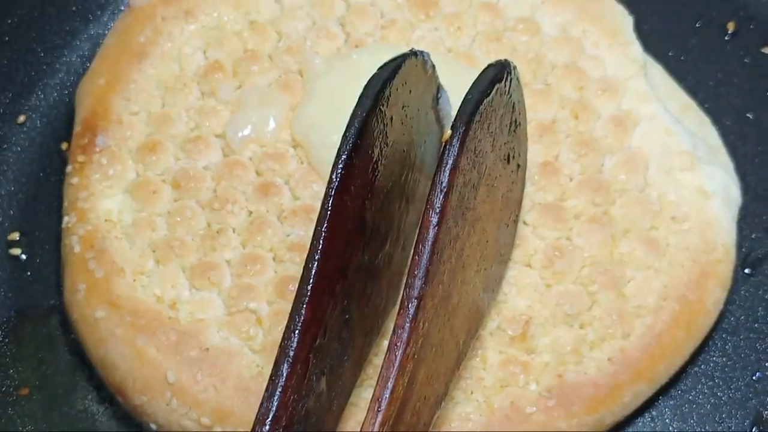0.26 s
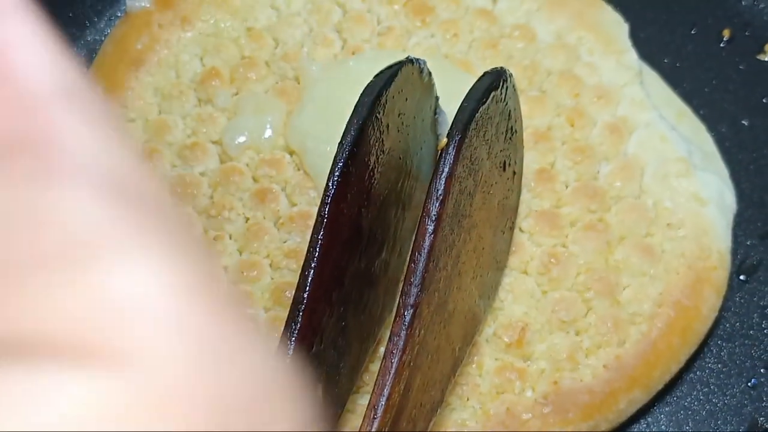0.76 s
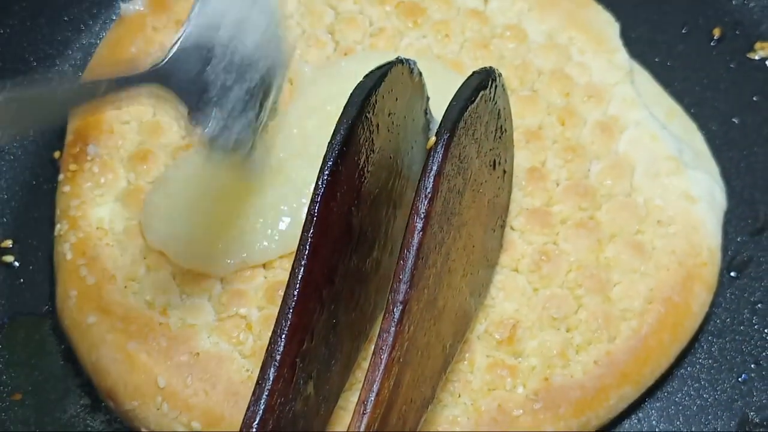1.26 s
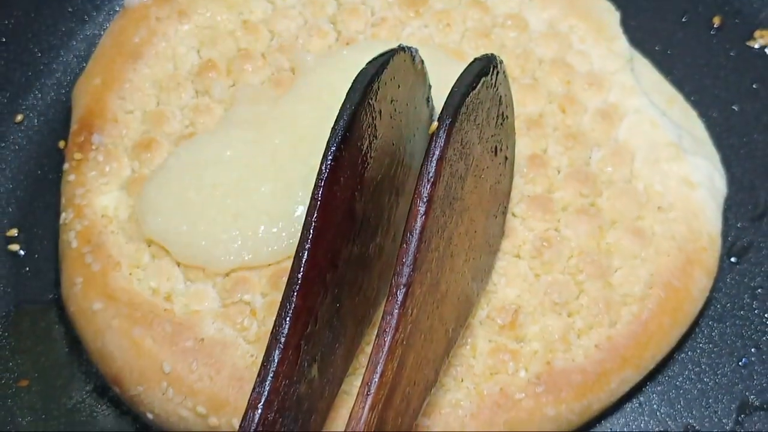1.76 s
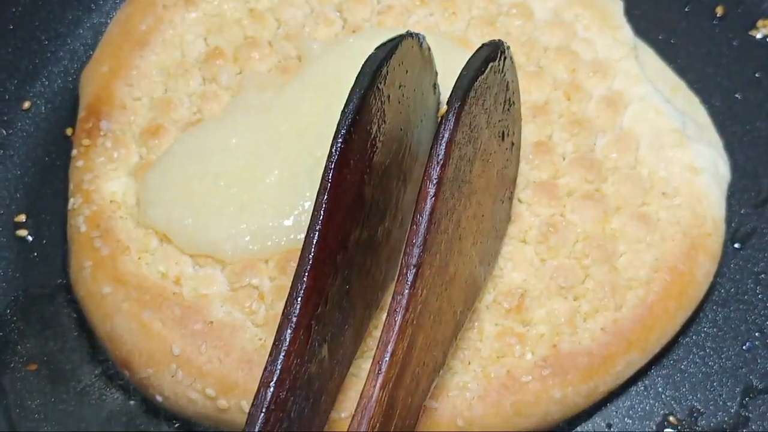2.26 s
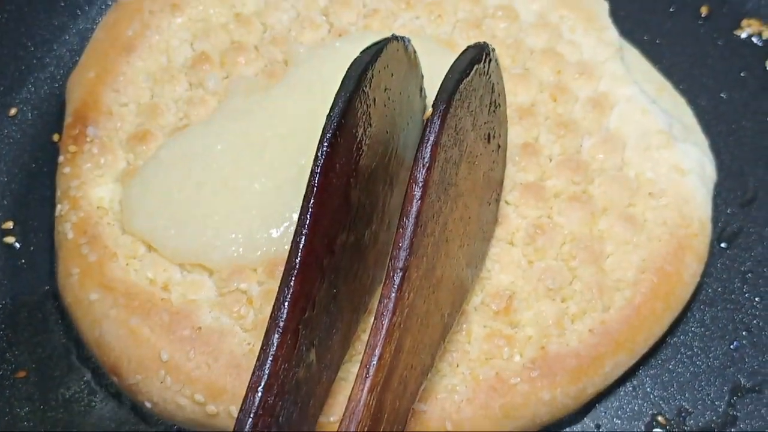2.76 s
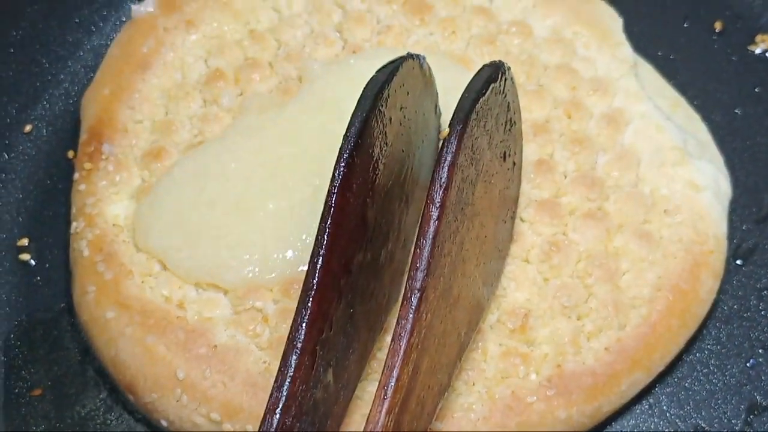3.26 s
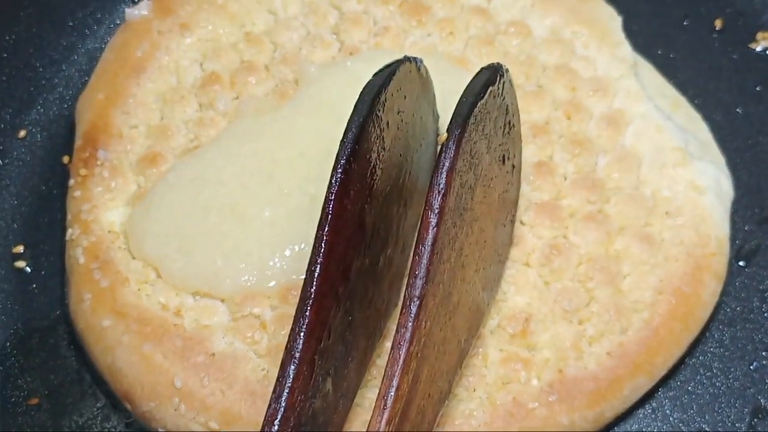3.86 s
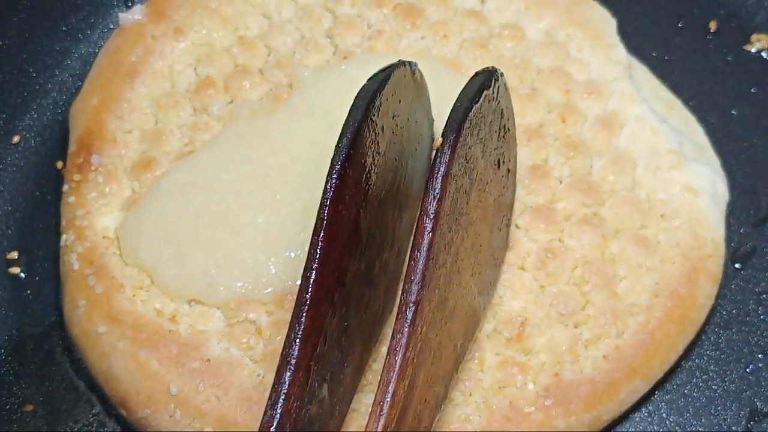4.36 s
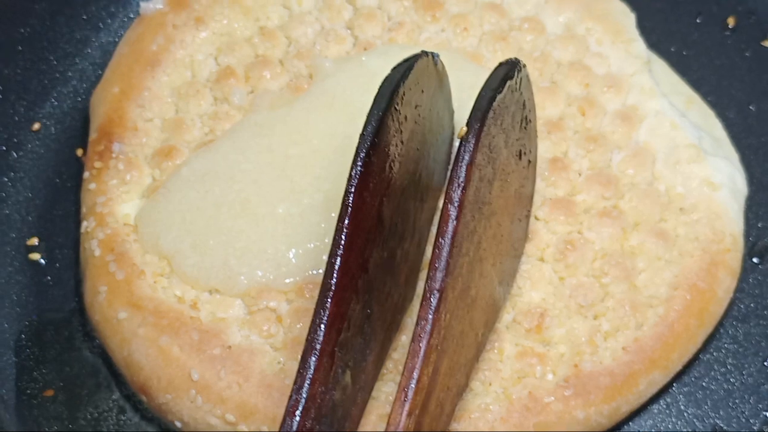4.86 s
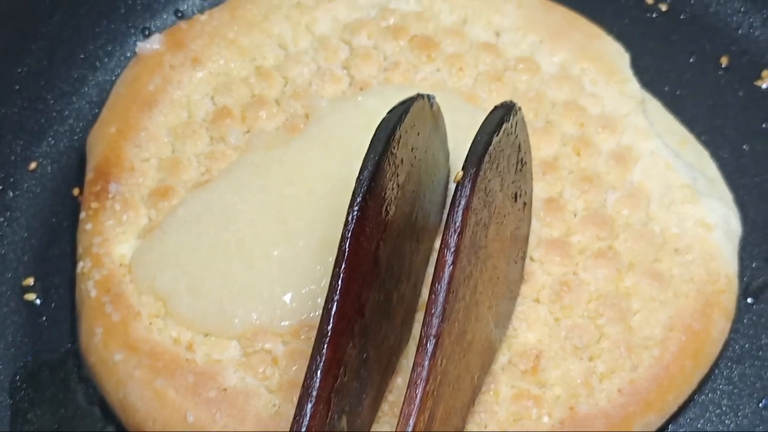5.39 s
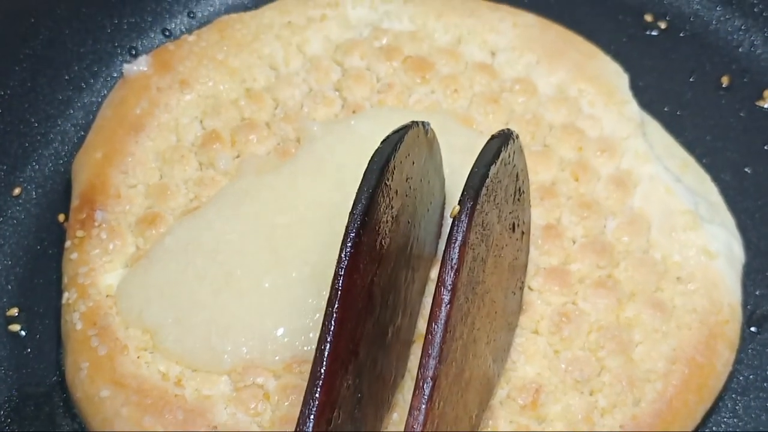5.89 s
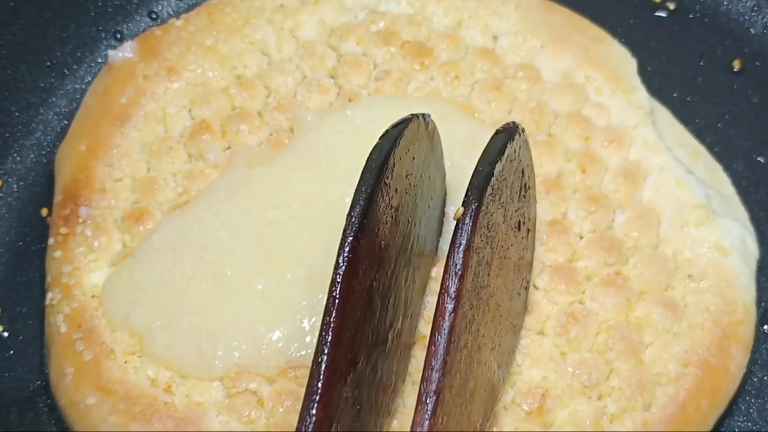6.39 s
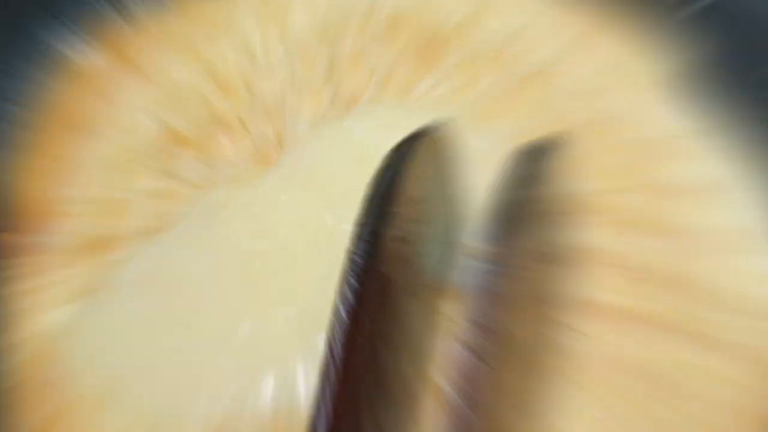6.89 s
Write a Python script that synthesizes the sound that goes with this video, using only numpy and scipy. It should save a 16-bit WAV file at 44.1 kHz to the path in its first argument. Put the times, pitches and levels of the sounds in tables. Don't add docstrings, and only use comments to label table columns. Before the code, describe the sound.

Close-up pan frying in a small hard kitchen: steady thin hiss, crackling bubbles, one ringing double spoon knock, and a brief dropout near the end.

```python
import sys
import numpy as np
from scipy import signal
from scipy.fft import rfft, irfft
from scipy.io import wavfile
from scipy.ndimage import uniform_filter1d

SR = 44100
rng = np.random.default_rng(int(sys.argv[2]) if len(sys.argv) > 2 else 0)


def unload_audio(sound):
    columns = np.transpose(np.atleast_2d(sound))
    steps = np.round(np.clip(columns, -1, 1) * 32767)
    wavfile.write(sys.argv[1], SR, steps.astype(np.int16))


def attenuation_scalar(level_db):
    decades = np.asarray(level_db, float) / 20
    return 10 ** decades


N = 314433

# (time [s], peak level [dB])
MURMUR_SWELLS = [
    (0.02, -60),
    (1.24, -50.5),
    (1.84, -74.5),
    (2.13, -50),
    (2.32, -32),
    (6.78, -57),
]
# (frequency [Hz], level [dB per Hz])
MURMUR_COLOUR = [(15, -64), (25, -12.5), (98, 3), (152, 0), (213, 3), (318, 6.5), (655, -3), (1460, -6.5),
                 (1890, -43.5), (2180, -23), (3000, -13), (3900, -47), (6600, -120)]
# (frequency [Hz], width [Hz], level [dB])
FLAME_RESONANCES = [(103.8, 27.4, -0.5), (160.6, 35, -0.5)]
# (time [s], peak level [dB])
FLAME_FLUTTERS = [
    [(1.24, -55), (1.94, -58), (2.24, -44.5), (3.29, -42), (3.55, -57), (3.74, -48.5), (5.54, -42),
     (6.09, -47), (6.69, -47)],
    [(1.3, -48.5), (2.24, -44), (3.15, -49), (3.29, -36), (3.9, -53), (6.6, -52), (6.82, -42.5)],
]
# (time [s], peak level [dB])
SLEEVE_SWISHES = [
    (0.04, -58.5),
    (0.15, -62),
    (0.36, -64.5),
    (1.17, -62),
    (1.62, -62),
    (1.78, -67),
]
# (time [s], level [dB], pitch [Hz])
TONGS_SLIDE = [
    (4.185, -58, 954),
    (4.21, -58.5, 953),
    (4.25, -44.5, 906),
    (4.27, -46.5, 627),
    (4.3, -50, 388),
    (4.35, -60, 280),
]
# (time [s], peak level [dB], hardness [Hz], deep modes [dB])
SPOON_KNOCKS = [
    (2.057, -28, 2000, -2.5),
    (2.182, -3.5, 2000, -6.5),
    (2.229, 2.5, 1800, 1.5),
    (2.303, -30, 3000, -3),
    (2.337, -19, 2960, -2.5),
]
# (frequency [Hz], level [dB], ring length [s]; a mode falls 60 dB in 0.7 of it)
VESSEL_MODES = [(164.6, -16.5, 0.55), (243, -15, 0.65), (299.4, 3, 0.26), (307, -6, 1.64), (332.3, 1, 0.43),
                (371, -3, 0.2), (398, -19, 0.5), (509, -2, 0.2), (527, 1.5, 0.19), (542.4, -10, 1.22),
                (612, -12, 0.35), (750.6, -6, 0.33), (802, -6, 0.12), (1086, -6.5, 0.12)]
# (time [s], sizzle level [dB])
FRYING_HEAT = [
    (0, -53),
    (1.05, -55.5),
    (1.6, -52),
    (2.15, -50),
    (2.6, -51.5),
    (4.3, -51.5),
    (5.0, -53),
    (7.13, -49.5),
]
# (frequency [Hz], level [dB per Hz])
SIZZLE_COLOUR = [(880, -56), (1500, -4), (1910, -23), (2200, -7), (3120, -13.5), (3380, -10), (4760, -9),
                 (5310, -2), (7320, -7), (9790, 5), (13000, -20.5), (15500, -0.5), (16000, -11),
                 (16500, -31)]
# (time [s], peak level [dB], pitch [Hz])
WET_PATCHES = [(2.089, -48, 3500), (2.269, -56, 2500), (5.76, -60, 2300), (6.31, -67, 3280),
               (6.22, -54, 5600), (2.36, -68, 1780), (2.74, -58, 1910), (2.8, -72, 4200), (2.9, -55, 3300),
               (3.04, -56, 3000), (4.25, -37, 3580), (4.3, -71, 2500), (4.52, -49, 4360), (4.62, -53, 4800),
               (5.03, -40, 3820), (5.08, -62, 4260), (5.07, -53.5, 1930), (5.19, -46.5, 4170),
               (5.23, -65, 4500), (5.38, -68, 1500), (5.27, -61, 1640), (5.7, -56, 2040),
               (5.731, -44.5, 5000), (5.84, -52, 4930), (5.93, -55, 1500), (6.148, -47, 5830),
               (6.23, -58, 3000), (6.31, -52, 1860), (6.33, -75, 5500), (6.47, -74, 4800)]
# (time [s], level
# [dB], pitch [Hz], width [octaves])
STEAM_BURSTS = [(0.4704, -26.5, 1540, 0.42), (0.4786, -26.5, 1640, 0.48), (0.7794, -22, 6280, 0.27),
                (1.2192, -21, 2620, 0.28), (1.2172, -27, 7000, 0.51), (1.2192, -20.5, 1406, 0.34),
                (1.303, -26.5, 12800, 1.03), (1.8559, -25, 8000, 0.74), (2.1805, -19, 2400, 0.47),
                (2.2273, -20, 2670, 0.52), (2.2496, -29, 6260, 0.19), (3.1729, -26, 3160, 0.77),
                (3.8323, -29, 5200, 0.85), (3.8588, -16, 5500, 0.36), (3.867, -20, 9000, .31),
                (4.0319, -29, 8430, 0.071), (4.0796, -27.5, 15100, 0.35), (4.3818, -16.5, 2620, 0.43),
                (4.3822, -24, 4400, 0.12), (4.3818, -26, 7700, 0.32), (4.8385, -22, 7000, 0.22),
                (4.8399, -18, 3650, 0.67), (4.8399, -21.5, 1500, 0.32), (4.9682, -29.5, 6950, 0.13),
                (5.4401, -26.5, 9600, 0.52), (5.5369, -30, 8400, 0.39), (6.1228, -26.5, 10800, 0.53),
                (6.2179, -29, 9000, 0.3), (6.379, -34, 11000, 0.16), (6.4609, -28.5, 13400, 0.56),
                (6.581, -37, 11700, 1), (6.5872, -24, 8700, 0.69)]
# (time [s], level [dB], pitch [Hz])
BUBBLE_PINGS = [(0.4655, -35.5, 1085), (0.886, -45, 2830), (0.9758, -39, 5050), (1.9909, -43, 15400),
                (2.3382, -44.5, 1580), (2.4694, -44, 5230), (2.5555, -33, 9300), (2.7692, -50, 14900),
                (3.6827, -47, 5720), (3.9435, -35, 11000), (4.1507, -41, 8570), (5.675, -38.5, 8700),
                (4.6001, -49, 10740), (4.6923, -49, 9300), (4.7239, -31, 8880), (4.8161, -43.5, 10500),
                (5.118, -50.5, 583), (5.2107, -47.5, 9600), (5.29, -62, 1640), (5.4378, -37, 5600),
                (5.4586, -38, 5960), (5.5454, -31.5, 3750), (5.716, -46, 4600), (5.9575, -38, 4400),
                (6.0779, -37.5, 8470), (6.2686, -40, 10600), (6.2723, -40.5, 10700), (6.5314, -30, 9300),
                (5.9575, -41.5, 5550), (6.739, -51, 10400)]
# (time [s], level [dB], pitch [Hz])
BUBBLE_SPITS = [(0.1857, -35, 10500), (0.6421, -36, 6200), (0.886, -40, 5140), (1.002, -37, 5530),
                (1.6547, -44, 6100), (1.6919, -33.5, 15600), (2.1172, -46, 4740), (2.287, -43, 6600),
                (2.3851, -46, 15290), (2.5577, -36.5, 5250), (2.7917, -41, 7370), (2.8969, -41.5, 6430),
                (3.0318, -44, 5540), (3.3973, -44, 15100), (4.017, -36.5, 7210), (4.0796, -47, 4200),
                (4.9682, -42, 4570), (5.0176, -51, 3900), (5.5454, -32.5, 5600), (5.6771, -39, 7000),
                (5.7469, -33.5, 6200), (5.7903, -43.5, 8500), (5.808, -38.5, 3850), (5.4405, -21.5, 15300),
                (6.2155, -38.5, 5950), (6.0779, -43, 6700), (4.842, -23.5, 15800), (6.2124, -40, 7320),
                (6.8859, -40.5, 15240), (7.0613, -52.5, 7040)]
# (time [s], level [dB], pitch [Hz])
FAT_SPLASHES = [(0.2428, -42.5, 15290), (0.296, -41.5, 12920), (0.6421, -43, 3560), (0.7794, -42, 2460),
                (0.9783, -35, 5370), (1.1424, -48.5, 9700), (1.264, -37, 10410), (1.375, -44.5, 15300),
                (1.4335, -43.5, 12000), (1.4544, -48, 9350), (1.776, -40, 14530), (1.999, -44, 5530),
                (2.0563, -42, 9000), (2.125, -36.5, 15200), (2.1628, -40.5, 2760), (2.3021, -41, 1780),
                (2.4585, -43.5, 8760), (2.8001, -43.5, 5400), (2.8735, -39, 11000), (3.54, -50, 4970),
                (3.693, -46.5, 4500), (4.253, -34, 2700), (4.2876, -44, 2220), (4.3244, -45, 15200),
                (4.962, -43, 7320), (5.0382, -45, 2560), (5.0853, -39.5, 9100), (5.9126, -43, 1600),
                (6.2124, -42.5, 3210), (7.1275, -43.5, 4070)]
# (time [s], level [dB], pitch [Hz])
TRAPPED_PLOPS = [(0.1857, -53.5, 2220), (0.946, -39.5, 2000), (0.9783, -54, 1660), (1.8559, -52.5, 1490),
                 (1.9263, -53, 2560), (2.4694, -39.5, 2000), (2.5871, -30, 2510), (4.5696, -39.5, 1620),
                 (2.8969, -47, 2500), (3.0318, -44.5, 2510), (3.1235, -50, 2500), (3.601, -35.5, 1185),
                 (3.8323, -37.5, 1670), (4.017, -52.5, 1860), (4.2264, -31.5, 2970), (4.2414, -32, 2800),
                 (4.5015, -44.5, 3140), (5.0176, -48.5, 1276), (6.6673, -49, 2200), (5.4401, -49.5, 1800),
                 (5.4586, -48, 2020), (5.7419, -38, 2170), (5.7469, -41, 2310), (5.8963, -46.5, 1150),
                 (6.2179, -48.5, 2140), (6.2987, -51.5, 960), (6.379, -50, 2200), (6.577, -39, 1740),
                 (6.581, -34, 1750), (6.9667, -50, 1930)]
# (time [s], level
# [dB], pitch [Hz])
STRAY_TICKS = [(0.393, -56, 6100), (0.698, -59, 5250), (1.302, -44, 2640), (1.575, -56.5, 2200),
               (1.763, -57, 6030), (2.709, -58.5, 1660), (2.735, -56, 2460), (2.74, -58, 970),
               (2.778, -53, 6000), (2.884, -47, 3460), (3.003, -58, 3420), (3.099, -50, 6700),
               (3.318, -55, 8100), (3.38, -58, 6000), (3.539, -55.5, 1500), (3.587, -54.5, 4600),
               (3.997, -58, 1510), (4.146, -56, 2210), (4.189, -57, 2070), (4.686, -56, 2210),
               (4.724, -60, 1640), (5.148, -58, 7000), (5.148, -64, 2980), (5.21, -53, 5700),
               (5.21, -57, 1600), (5.25, -57.5, 1640), (5.36, -53, 7200), (5.368, -56, 3800),
               (5.365, -56, 1180), (5.424, -58, 3000), (3.859, -28, 15500), (1.219, -37, 15300),
               (6.123, -36, 15300), (6.587, -27, 15100), (5.545, -38, 15300), (1.303, -21, 15400),
               (6.09, -45, 15300), (6.22, -39, 15300), (5.537, -57, 4820), (5.677, -53.5, 2100),
               (5.79, -50.5, 3390), (5.913, -42.5, 3290), (5.957, -43, 7100), (6.047, -59, 2220),
               (6.108, -50, 4800), (6.124, -51, 2800), (6.131, -36, 9800), (6.133, -42.5, 5630),
               (6.171, -58, 1990), (6.299, -56, 3320), (6.325, -53, 5500), (6.379, -49.5, 5600),
               (6.461, -48, 5060), (6.564, -51, 5190), (7.065, -49, 6170)]
# (frequency [Hz], width [Hz], level [dB])
PAN_RESONANCES = [(1475, 160, 2), (1640, 50, 2), (2200, 120, 2), (2440, 200, -10.5), (3400, 98, -2),
                  (3940, 86, -3), (4400, 180, 2), (5400, 410, -0.5), (6060, 470, 1.5), (7000, 350, -6)]
# (frequency [Hz], width [Hz], share [ratio])
MICROPHONE_PORT = [(9930, 1250, 1.63), (12280, 1600, -0.74), (13700, 2500, -1.6), (8116, 1100, -0.68),
                   (15800, 1200, 1.2)]
# (frequency [Hz], time to fall 60 dB [s])
KITCHEN_ECHO = [(700, 0.26), (1400, 0.22), (3500, 0.21), (6000, 0.089), (14000, 0.18)]
# (off [s], faint return [s], fully on [s])
DROPOUT_TIMES = (6.988, 7.048, 7.057)


def rms_one(x):
    return x / np.sqrt(np.mean(x ** 2) + 1e-20)


def in_time(rows, outside=None):
    s, *columns = np.transpose(rows)
    t = np.arange(N) / SR
    return [np.interp(t, s, column, outside, outside) for column in columns]


def at_hz(points, hz):
    point_hz, value = np.array(points).T
    return np.interp(np.log(hz), np.log(point_hz), value)


def band(x, low_hz, high_hz, order=2):
    edges = [low_hz, min(high_hz, 0.45 * SR)]
    return signal.sosfilt(signal.butter(order, edges, "band", fs=SR, output="sos"), x)


def drift(rate_hz):
    r = np.exp(-80 * np.pi * rate_hz / SR)
    noise = rng.standard_normal(N // 40 + 2002)
    slow = signal.lfilter([1], [1, -2 * r, r * r], noise)[2000:]
    return np.interp(np.arange(N) / 40, np.arange(len(slow)), rms_one(slow))


def swells(peaks, rest_db, rise, fall):
    t = np.arange(0, N / SR, 0.002)
    peaks = np.array(peaks)
    late = t - peaks[:, :1]
    each_db = peaks[:, 1:] + np.where(late < 0, rise, -fall) * late
    power = attenuation_scalar(2 * rest_db) + np.sum(attenuation_scalar(2 * each_db), axis=0)
    return np.interp(np.arange(N) / SR, t, 10 * np.log10(power))


def ring(clicks, hz, t60):
    r, w = attenuation_scalar(-60 / (t60 * SR)), 2 * np.pi * hz / SR
    return signal.lfilter([0, np.sin(w)], [1, -2 * r * np.cos(w), r * r], clicks + 1e-18)


def resonance(x, hz, width_hz):
    r = np.exp(-np.pi * width_hz / SR)
    feedback = [1, -2 * r * np.cos(2 * np.pi * hz / SR), r * r]
    return signal.lfilter(np.array([1, 0, -1]) * (1 - r * r) / 2, feedback, x)


def causal(gain):
    fold = irfft(np.log(gain + 1e-4))
    half = fold.shape[-1] // 2
    return np.exp(rfft(fold * np.r_[1, np.full(half - 1, 2), 1, np.zeros(half - 1)]))


def coloured(sources, spectrum, patchy_db, count):
    low_end, high_end = spectrum[0][0], spectrum[-1][0]
    steps = int(np.log2(high_end / low_end) * count) + 2
    edges = low_end * 2 ** (np.arange(steps) / count)
    out = 0
    for k, (low, high) in enumerate(zip(edges, edges[1:])):
        level_db = at_hz(spectrum, np.sqrt(low * high)) + patchy_db * drift(3.3)
        out = out + attenuation_scalar(level_db) * band(sources[k % 2], low, high, order=3)
    return rms_one(out)


def background():
    rumble = 0
    for (hz, width_hz, level_db), flutters in zip(FLAME_RESONANCES, FLAME_FLUTTERS):
        flutter_db = swells(flutters, rest_db=-61, rise=88.5, fall=251.5)
        flame = resonance(rng.standard_normal(N), hz, width_hz)
        rumble = rumble + attenuation_scalar(level_db + flutter_db - 8.0) * rms_one(resonance(flame, hz, width_hz))
    murmur_db = swells(MURMUR_SWELLS, rest_db=-58, rise=146.5, fall=202)
    murmur = coloured(rng.standard_normal((2, N)), MURMUR_COLOUR, patchy_db=2.5, count=3)
    return attenuation_scalar(murmur_db - 2.5) * murmur + rumble


def swish():
    level_db = swells(SLEEVE_SWISHES, rest_db=-85.5, rise=121, fall=120)
    return attenuation_scalar(level_db) * rms_one(band(rng.standard_normal(N), 560, 908, order=3))


def scrape():
    level_db = in_time(TONGS_SLIDE, outside=-120)[0]
    turn = 2 * np.pi * np.cumsum(in_time(TONGS_SLIDE)[1]) / SR
    rubbing = rng.standard_normal(N) * attenuation_scalar(4 * drift(90))
    rough = rms_one(signal.lfilter([1], [1, -1.96, 0.9604], rubbing))
    return band(attenuation_scalar(level_db) * rough * np.sqrt(2) * np.sin(turn), 200, 3000)


def spoon():
    out = np.zeros(N)
    size = 18000
    late = np.arange(size) / SR
    rattle = band(rng.standard_normal(size), 600, 3500) * attenuation_scalar(-60 * late / 0.33)
    for s, peak_db, hard_hz, deep_db in SPOON_KNOCKS:
        click = np.exp(-2 * np.pi * hard_hz * late) * 2 * np.pi * hard_hz / SR
        at = round(s * SR)
        out[at:at + size] += attenuation_scalar(peak_db - 26.0) * rattle
        for hz, level_db, t60 in VESSEL_MODES:
            mode_db = peak_db + level_db - 19.5 + 1.2 * rng.normal()
            mode_db += deep_db * (hz < 350)
            out[at:at + size] += attenuation_scalar(mode_db) * ring(click, hz, 0.7 * t60)
    rocking_db = 1 * drift(40)
    stilled_db = 400 * np.maximum(np.arange(N) / SR - 2.5, 0)
    return out * attenuation_scalar(rocking_db - stilled_db)


def sizzle():
    level_db = in_time(FRYING_HEAT)[0]
    sizes = attenuation_scalar(2.5 * np.minimum(rng.exponential(1, (2, N)), 6)) * rng.choice([-1, 1], (2, N))
    born = rng.random((2, N)) < 3000 * attenuation_scalar(4 * drift(15)) / SR
    grains = rms_one(sizes * born) * 3.1 + rng.standard_normal((2, N))
    return attenuation_scalar(level_db) * coloured(grains, SIZZLE_COLOUR, patchy_db=1.2, count=5)


def sputter():
    sizes = attenuation_scalar(0.8 * np.minimum(rng.exponential(1, N), 5)) * rng.choice([-1, 1], N)
    born = rng.random(N) < 6000 * attenuation_scalar(3 * drift(25)) / SR
    dealt = rng.integers(0, 16, N)
    out = 0
    for k, hz in enumerate(np.geomspace(1200, 6500, num=16)):
        peaks = [(s, db - 19.5 * abs(np.log2(hz / patch_hz))) for s, db, patch_hz in WET_PATCHES]
        level_db = swells(peaks, rest_db=-69, rise=399.5, fall=208)
        out = out + attenuation_scalar(level_db - 10.5) * rms_one(ring(sizes * born * (dealt == k), hz, 45 / hz))
    return band(out, 990, 9000)


def pops():
    size, lead = 4096, 700
    late = (np.arange(size) - lead) / SR
    t = np.maximum(late, 0)
    events = list(STEAM_BURSTS)
    for rows, octaves in ((BUBBLE_PINGS, 0.06), (BUBBLE_SPITS, 0.31), (FAT_SPLASHES, 0.96),
                          (TRAPPED_PLOPS, 0.28), (STRAY_TICKS, 0.31)):
        events += [(*row, octaves) for row in rows]
    s, level_db, hz, octaves = np.array(events).T[..., None]

    noise = rng.standard_normal((len(s), size))
    clumps = uniform_filter1d(rng.standard_normal((len(s), size)), size=40)
    fade_s = 0.0039 + 8.8 / hz
    linger = attenuation_scalar(-17.5) * np.exp(-t / 0.029) * (1 - t / t[-1])
    after = (1 - np.exp(-t / 0.0019)) * (np.exp(-t / fade_s) + linger)
    snap = lead + 50
    fizz = attenuation_scalar(-9.5) * np.minimum(hz / 5000, 1) * np.exp(-np.abs(late - 50 / SR) / 0.0038)
    spray = noise * attenuation_scalar(2.0 * rms_one(clumps)) * (after + fizz)
    spray[:, snap] += 4.5 + 26000 / hz[:, 0]

    bins = np.arange(size // 2 + 1)
    pitch = np.log2(np.maximum(bins, 1) * SR / size)
    colour = np.exp(-((pitch - np.log2(hz)) / (2 * octaves)) ** 2)
    colour = colour / (1 + (0.48 * np.minimum(hz, 1500) / 2 ** pitch) ** 8)
    ragged = uniform_filter1d(rng.standard_normal((len(s), len(bins))), size=30)
    ragged = attenuation_scalar(2.2 * rms_one(ragged))
    part = irfft(rfft(spray) * causal(colour * ragged))
    bursts = attenuation_scalar(level_db + 26.0) * part / np.sqrt(np.sum(part ** 2, axis=1, keepdims=True))
    out = np.zeros(N + size)
    for at, burst in zip(np.round(s[:, 0] * SR).astype(int) - lead, bursts):
        out[at:at + size] += burst
    return out[:N]


def pan(x):
    return sum(attenuation_scalar(level_db) * resonance(x, hz, width_hz) for hz, width_hz, level_db in PAN_RESONANCES)


def microphone_port(x):
    for hz, width_hz, share in MICROPHONE_PORT:
        x = x + share * resonance(x, hz, width_hz)
    return x


def kitchen(x):
    t = np.arange(SR // 2) / SR
    noise = rng.standard_normal(len(t)) * (1 - np.exp(-t / 0.00088))
    tail = 0
    for hz in 250 * 2.0 ** np.arange(7):
        octave = band(noise, hz / np.sqrt(2), hz * np.sqrt(2))
        tail = tail + octave * attenuation_scalar(-60 * t / at_hz(KITCHEN_ECHO, hz))
    return signal.fftconvolve(x, tail / np.sqrt(np.sum(tail ** 2)))[:N]


def scene():
    vessel = band(spoon(), 164, 7200, order=3)
    patches = sputter()
    patches = attenuation_scalar(5.5) * pan(patches) + attenuation_scalar(-6.5) * patches
    near = microphone_port(pops())
    near = near + attenuation_scalar(-6) * pan(near)
    echoes = kitchen(attenuation_scalar(-10.0) * near + attenuation_scalar(-4.5) * vessel + attenuation_scalar(-17.5) * patches)
    mono = background() + swish() + scrape() + vessel + sizzle() + patches + near + echoes
    return np.array([mono, mono])


def band_limit(x):
    return signal.sosfilt(signal.butter(12, 16990, fs=SR, output="sos"), x)


def record(dry):
    x = dry[0]
    t = np.arange(N) / SR
    off, faint, on = DROPOUT_TIMES
    x = x * np.where((t > off) & (t < on), attenuation_scalar(-32.5) * (t > faint), 1)
    x = np.clip(x, -1, 1)
    x = signal.sosfilt(signal.cheby2(12, 60, 16400, fs=SR, output="sos"), x)
    only_treble = signal.cheby2(14, 70, 3900, "high", fs=SR, output="sos")
    treble = signal.sosfilt(only_treble, np.roll(x, shift=30))
    width = attenuation_scalar(-7.0) * treble * np.clip(3 * drift(12) - 1.5, 0, 1)
    return band_limit(np.array([x + width, x - width]))


dry = scene()
out = record(dry)
unload_audio(out)
```